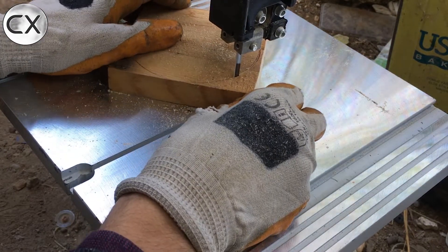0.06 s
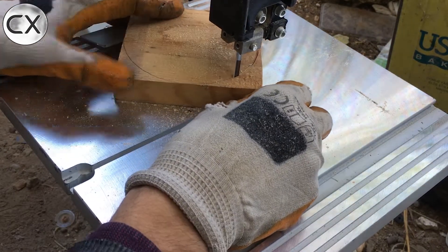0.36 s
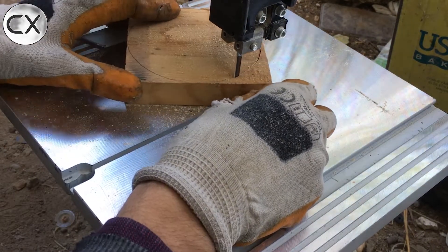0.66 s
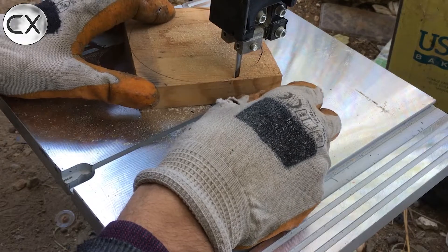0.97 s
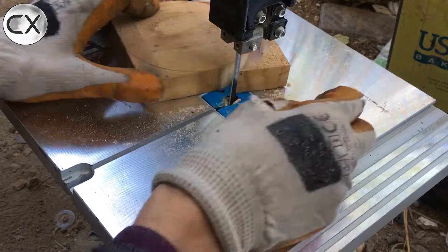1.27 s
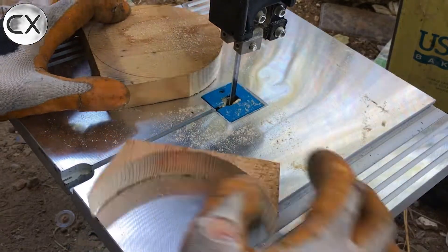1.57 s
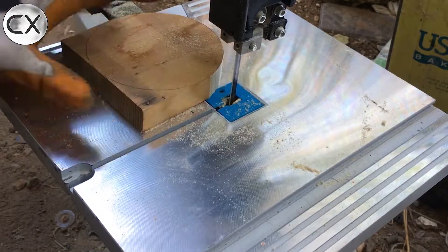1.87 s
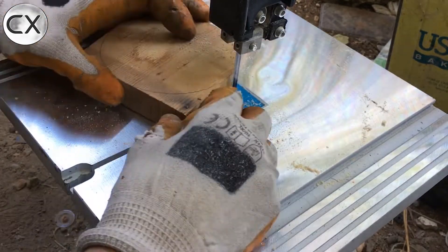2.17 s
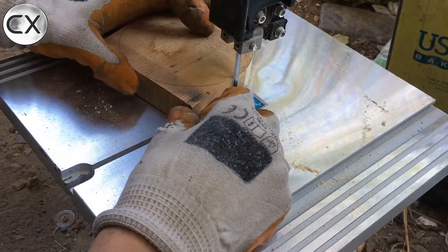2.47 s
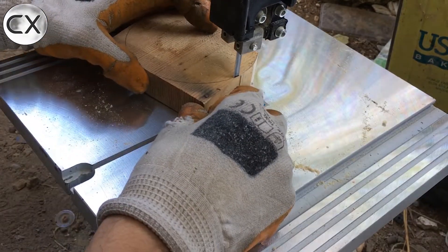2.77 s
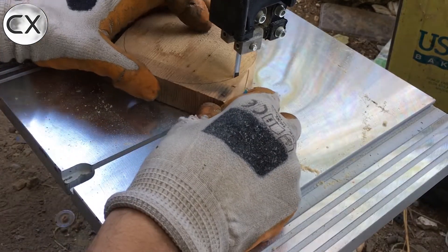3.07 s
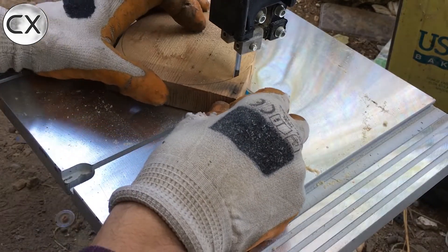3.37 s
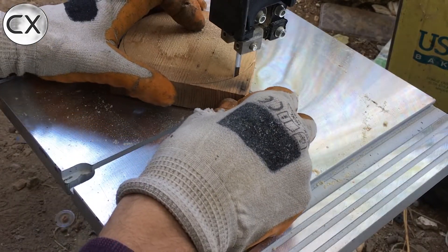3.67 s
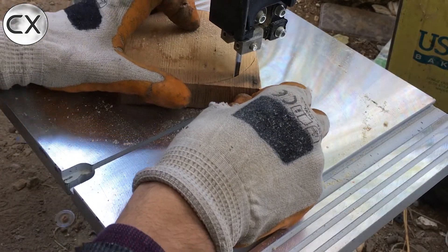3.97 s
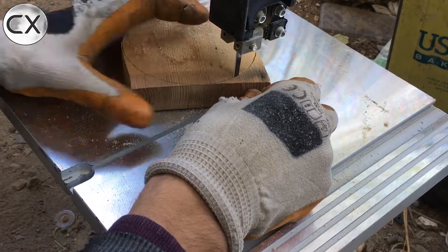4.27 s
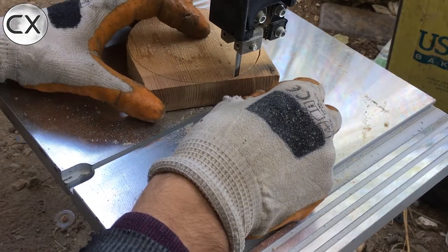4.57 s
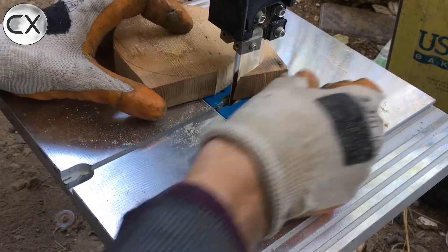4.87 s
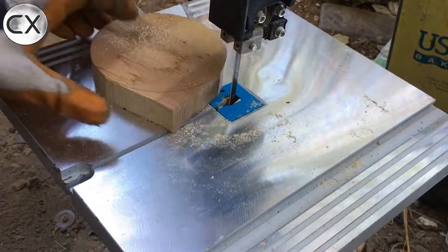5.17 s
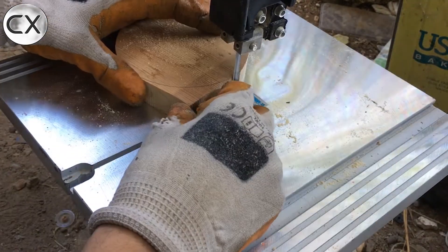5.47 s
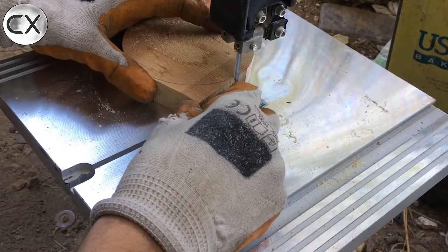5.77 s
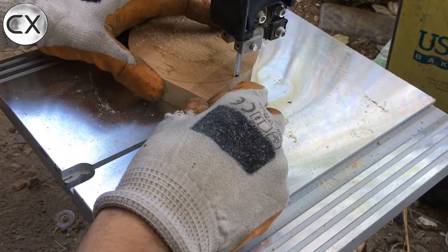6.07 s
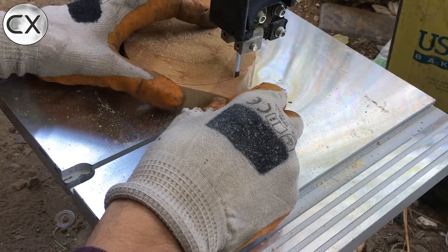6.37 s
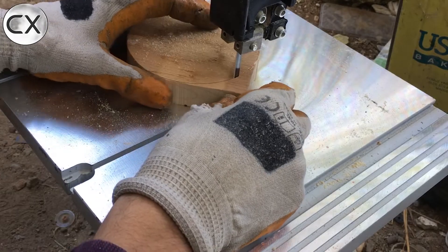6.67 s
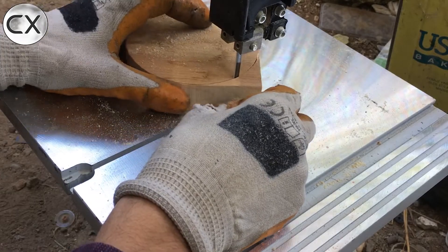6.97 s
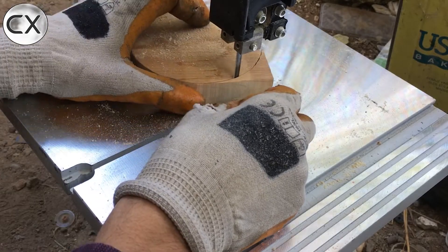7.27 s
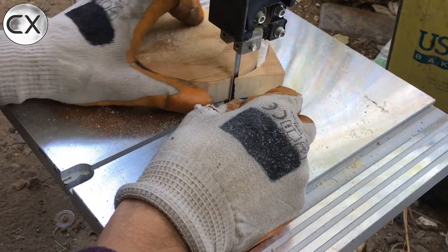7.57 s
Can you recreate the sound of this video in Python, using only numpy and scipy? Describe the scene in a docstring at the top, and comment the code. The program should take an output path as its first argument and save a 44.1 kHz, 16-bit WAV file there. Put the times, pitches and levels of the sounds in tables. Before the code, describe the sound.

A small band saw whines close by through three hissing, squealing cuts in a thick wooden block, running free briefly between them.

```python
"""A workshop, one microphone close to a small band saw; no room sound, both channels alike.
Motor, wheels and teeth whine through the frame, running free between three cuts in a thick wooden block.
Chips tick against the blade and an offcut drops. In the wood the teeth hiss, the grain grabs the blade
into squeals, and the blade rings higher as it is pressed, singing an almost pure tone when held steady."""
import sys
import numpy as np
from scipy import signal
from scipy.fft import rfft, irfft
from scipy.io import wavfile
from scipy.ndimage import uniform_filter1d

SR = 44100
rng = np.random.default_rng(int(sys.argv[2]) if len(sys.argv) > 2 else 0)


def persist_wave(psi):
    """Save psi, clipped to +-1, as 16-bit WAV."""
    counts = np.round(np.clip(psi, -1, 1) * 32767).astype(np.int16)
    wavfile.write(sys.argv[1], SR, np.atleast_2d(counts).T)


N = 336042
T = np.arange(N) / SR
FREE_TURNS_PER_S = 42.62  # the motor with no load

# lines of motor, wheels and teeth: (multiple of motor speed, level free [dB], level in the wood [dB])
WHINE_LINES = [(4.96, -97, -98.5), (6.02, -90.5, -94), (9.69, -104, -86), (12.06, -74, -84),
               (12.73, -94.5, -86), (14.05, -78.5, -83), (14.22, -99.5, -84), (16.27, -84, -87.5),
               (18.04, -88.5, -92), (19.9, -98, -81.5), (21.88, -79.5, -79), (23.82, -86.5, -80),
               (25.74, -96.5, -78), (30.57, -74, -83.5), (39.94, -71, -71), (42, -69, -69),
               (43.95, -65, -72), (45.85, -60, -76), (46, -60, -76), (46.74, -67, -72), (48, -60, -66),
               (48.7, -55.5, -60), (50.69, -74, -73), (52, -66, -70), (54, -69, -74), (54.35, -71, -76),
               (56, -56, -60), (56.33, -61, -63), (57.28, -74, -69), (58, -64, -64), (70, -80, -83),
               (76, -75, -85), (87.34, -70, -79), (90.8, -67, -67), (96, -68, -73), (98, -68, -70),
               (110, -75, -89), (111.8, -68, -74.5), (120, -82, -92.5), (123.5, -83, -92.5),
               (119.8, -79, -91), (137.5, -73.5, -93)]
# slow swell of whine and frame: (time [s], level [dB])
WHINE_SWELL = [(0, 1.3), (1.5, -1), (1.8, -1), (2.3, 0.9), (3.22, -1), (3.42, .8), (4.2, -0.36),
               (4.87, 1.1), (5.05, 0.5), (5.42, 1.5), (5.9, 0.7), (7.05, 0.5), (7.38, 1.5)]
# rolling noise of the frame: (frequency [Hz], level [dB])
FRAME_SPECTRUM = [(20, -149), (110, -145), (190, -126), (380, -112), (550, -106), (820, -110), (1000, -99),
                  (1450, -109), (1650, -97), (2000, -88), (2220, -93.5), (2420, -86.5), (2680, -106),
                  (3000, -104)]
# rolling noise of the blade guides: (frequency [Hz], level [dB])
GUIDE_SPECTRUM = [(2700, -106), (3300, -95.5), (3550, -101), (4100, -85), (4550, -97.5), (5200, -93.5),
                  (5500, -102), (5850, -95), (7050, -106), (7550, -94.5), (8200, -106), (8700, -103),
                  (9200, -109), (10500, -111), (12700, -108), (13600, -114), (15600, -106)]
# the offcut lands and bounces: (time [s], knock level [dB], thud level [dB])
OFFCUT_LANDINGS = [(1.740, -46.5, -51), (1.864, -47.5, -66)]
# modes of the offcut: (frequency [Hz], level [dB], time to fall 60 dB [s])
OFFCUT_MODES = [(480, -19, 0.024), (770, -5, 0.016), (940, -4, 0.039), (1150, 2, 0.019),
                (1480, -2.5, 0.018), (3250, 0, 0.0064), (5200, -10, .008), (7560, 1.5, 0.0079)]
# chips flicked by the teeth: (time [s], level [dB], ring frequency [Hz])
CHIP_HITS = [(1.569, -39, 8600), (1.604, -26.5, 14000), (2.291, -43, 11600), (5.0345, -40.5, 8700),
             (5.044, -44, 8700), (5.107, -44, 8100)]
# wood rubbing blade and table: (start [s], end [s], frequency [Hz], width [Hz], level [dB])
RUB_WHISTLES = [(0, .55, 9570, 120, -62), (1.544, 1.66, 1318, 50.6, -63), (1.62, 1.78, 5280, 200, -67),
                (1.353, 2.5, 12800, 130, -82), (2.266, 2.523, 11760, 253, -65),
                (2.332, 3.2, 12600, 350, -66), (2.62, 3.274, 1335, 110, -74),
                (3.877, 4.33, 15500, 447, -60.5), (5.47, 5.68, 12140, 300, -72.5),
                (6.22, 6.519, 1341, 89.4, -71.5), (6.298, 7.25, 1090, 49.6, -73),
                (6.722, 6.9, 11630, 151.5, -49), (7.151, 7.557, 13880, 1317, -53)]
# resonances of blade and guides: (frequency [Hz], width [Hz], lift [dB])
STEEL_RESONANCES = [(3530, 100, 8.5), (4203, 160, 8), (4364, 115, 7.5), (4674, 50, 7.5), (5950, 130, 3),
                    (6010, 87, 9), (6370, 120, 9.5), (6776, 103, 9), (6865, 42, 7.5), (7500, 200, -0.5),
                    (7760, 190, 12), (8535, 265, 12), (9500, 210, 6.5), (9890, 150, 2), (9650, 42, -2.5),
                    (10330, 90, 5), (10640, 270, 10.5), (11340, 260, 7.5), (11600, 200, 4.5),
                    (13140, 160, 7), (13270, 140, 5.5), (14900, 99, -3)]
# the three cuts: (entry [s], break-out [s], spring-back time [s], entry rasp level [dB])
BLOCK_CUTS = [(-0.5, 1.233, 0.0359, -55), (2.451, 4.842, .038, -48), (5.613, 7.572, .046, -51)]
# the hands ease off to turn the block: (time [s], half length [s], share of the push let go [0-1])
HAND_PAUSES = [(0.166, .025, 0.1), (0.432, 0.043, 0.24), (2.536, .02, .1), (4.337, .028, .51),
               (6.586, .029, 0.57)]
# hiss of the teeth in the wood: (frequency [Hz], level [dB])
KERF_SPECTRUM = [(2700, -103), (3100, -99), (3500, -84.5), (4300, -88.5), (5300, -91), (7200, -96),
                 (8100, -99), (8800, -87.5), (10400, -92.5), (11050, -91), (12300, -89), (13500, -86),
                 (15600, -88)]
# the grain grabs the blade: (start [s], end [s], level [dB], first pitch [Hz], last pitch [Hz])
GRAIN_SQUEALS = [(-.03, 0.046, -47, 9560, 9540), (.115, .275, -51.5, 9600, 9450),
                 (.53, .63, -50, 9950, 9700), (.77, 1.0, -49, 10050, 9950), (1.0, 1.115, -43, 9900, 9600),
                 (1.184, 1.24, -47.5, 9500, 9350), (2.615, 2.67, -44.5, 9780, 9700),
                 (2.69, 3.2, -49.5, 9650, 9880), (3.69, 3.75, -44.5, 9900, 9950),
                 (3.8, 4.281, -47.5, 10000, 9830), (3.93, 4.015, -45, 10100, 9900),
                 (4.055, 4.094, -43, 10140, 9810), (4.39, 4.47, -45.5, 10000, 9930),
                 (4.5, 4.84, -49.5, 9900, 9820), (6.13, 6.52, -50, 9720, 9620),
                 (6.63, 7.146, -48.5, 9600, 9400), (6.76, 6.804, -46.5, 9490, 9520),
                 (6.89, 7.032, -44.5, 10200, 9550), (7.15, 7.56, -45, 9630, 9750),
                 (7.48, 7.541, -42, 9950, 9400)]
# the blade's pitch under full push, highest while the cut twists it: (time [s], pitch [Hz])
PRESSED_PITCH = [(1.2, 3550), (2.6, 3610), (3.7, 3640), (4.3, 3530), (5.7, 3530), (6.2, 3650), (6.6, 3540)]
# how loudly the frame carries the blade's rough note: (pitch [Hz], level [dB])
FRAME_RESPONSE = [(950, -68), (1400, -76), (1680, -47.5), (1800, -45), (2050, -55.5), (2290, -40),
                  (2480, -53), (2850, -57), (3550, -57.5)]
# held steady, the blade sings: (start [s], end [s], pitch [Hz], starting level [dB])
SUNG_NOTES = [(-.02, .38, 3530, -53.5), (.5, 1.213, 3537, -57), (2.59, 2.72, 3680, -47.5),
              (2.72, 3.049, 3660, -50), (3.13, 3.243, 3675, -54.5), (4.39, 4.831, 3560, -55.5),
              (5.66, 6.053, 3530, -55.5), (6.05, 6.298, 3645, -58), (6.63, 7.15, 3577, -55.5)]


def from_db(db):
    """Decibels to gain."""
    return 10 ** (np.asarray(db) / 20)


def in_time(points):
    """A (time, value) curve at every sample."""
    return np.interp(T, *np.transpose(points))


def at_hz(points, hz):
    """Gain of a spectrum, falling 120 dB an octave past its ends."""
    f, db = np.transpose(points)
    octaves_beyond = np.abs(np.log2((hz + 1) / np.clip(hz + 1, f[0], f[-1])))
    return from_db(np.interp(np.log(hz + 1), np.log(f), db) - 120 * octaves_beyond)


def filtered(x, order, hz, kind):
    """Butterworth filter."""
    return signal.sosfilt(signal.butter(order, hz, kind, fs=SR, output="sos"), x)


def hiss(spectrum):
    """Noise with the given spectral density."""
    gain = at_hz(spectrum, np.arange(N // 2 + 1) * SR / N)
    return irfft(rfft(rng.standard_normal(N)) * gain, N) * np.sqrt(SR / 2)


def drift(rate_hz):
    """Smooth random wander, rms 1."""
    lowpass = signal.butter(2, rate_hz, fs=SR / 10, output="sos")
    slow = signal.sosfilt(lowpass, rng.standard_normal(N // 10 + 4002))[4000:]
    slow = slow / np.sqrt(np.mean(slow ** 2) + 1e-20)
    return np.interp(np.arange(N) / 10, np.arange(len(slow)), slow)


def angle(hz):
    """Phase of a moving frequency."""
    return 2 * np.pi * np.cumsum(hz * np.ones(N)) / SR


def narrow(phase, width_hz):
    """A resonance driven by friction: a narrow band of noise."""
    return drift(width_hz / 2) * np.cos(phase) + drift(width_hz / 2) * np.sin(phase)


def ring(x, hz, t60):
    """A unit click sets a sine of height 1 ringing."""
    r, w = from_db(-60 / (t60 * SR)), 2 * np.pi * hz / SR
    return signal.lfilter([0, np.sin(w)], [1, -2 * r * np.cos(w), r * r], x + 1e-18)


def click(s, db):
    """One contact, one sample long."""
    return from_db(db) * (np.arange(N) == round(s * SR))


def held(start, end, fade_s):
    """Fade in around the start, hold, fade out around the end."""
    return np.clip(.5 + np.minimum(T - start, end - T) / fade_s, 0, 1)


def dying(s, decay_s):
    """1 until the given moment, then an exponential decay."""
    return np.exp(-np.maximum(T - s, 0) / decay_s)


def blend(parts):
    """Joint strength and mean pitch of (gain, Hz) parts that share one vibration."""
    power = sum(gain ** 2 for gain, hz in parts) + 1e-20
    return np.sqrt(power), sum(gain ** 2 * hz for gain, hz in parts) / power


def motor(push, grab, cut_sag_hz=.16, squeal_sag_hz=.24, loud_squeal_db=-43, inertia_s=.06):
    """Shaft angle: the motor slows in the wood and more in a squeal, as fast as the wheels allow."""
    sag = cut_sag_hz * push + squeal_sag_hz * grab / from_db(loud_squeal_db)
    keep = np.exp(-1 / (inertia_s * SR))
    sag = signal.lfilter([1 - keep], [1, -keep], sag, zi=[cut_sag_hz])[0]
    return angle(FREE_TURNS_PER_S - sag + 0.02 * drift(8.2))


def whine(turn, load, waver_db=2.0, slip_rad=0.0061):
    """The strong lines of motor, wheels and teeth; each shifts in strength as the blade is loaded."""
    out = 0
    for order, free_db, loaded_db in WHINE_LINES:
        level = from_db(free_db + load * (loaded_db - free_db) + waver_db * drift(10.8))
        phase = order * (turn + slip_rad * drift(8.4)) + rng.uniform(0, 2 * np.pi)
        out = out + level * np.sqrt(2) * np.sin(phase)
    return out


def buzz(turn, body, even_db, odd_db, wheel_db, scatter_db):
    """Even and odd motor harmonics through a body; the wheels, three times slower, add side lines."""
    k, size = np.arange(1000), 2 ** 15  # wheel harmonics, samples in one wheel turn
    line_db = np.where(k % 6 == 0, even_db, np.where(k % 3 == 0, odd_db, wheel_db))
    line_db = line_db + scatter_db * rng.uniform(-1, 1, len(k))
    lines = at_hz(body, k * FREE_TURNS_PER_S / 3) * from_db(line_db)
    cycle = irfft(lines * np.exp(2j * np.pi * rng.random(len(k))), size) * size / np.sqrt(2)
    wheel_position = turn / (6 * np.pi) % 1
    return np.interp(wheel_position * size, np.arange(size), cycle)


def machine(turn, load, flicker_db=0.55):
    """The bed under everything: whine, buzz and rolling noise of the running saw."""
    frame = from_db(-0.5) * hiss(FRAME_SPECTRUM)
    frame += buzz(turn, FRAME_SPECTRUM, even_db=12.5, odd_db=14.0, wheel_db=6.0, scatter_db=4.0)
    guides = from_db(-1.5) * hiss(GUIDE_SPECTRUM)
    guides += buzz(turn, GUIDE_SPECTRUM, even_db=20.5, odd_db=8.5, wheel_db=5.5, scatter_db=0.0)
    guides *= from_db(drift(18) + 0.59 * np.sin(turn / 3) - 4.17)  # pressure varies as the wheels turn
    swell = from_db(in_time(WHINE_SWELL) + flicker_db * drift(8.8))
    return swell * (whine(turn, load) + frame) + guides


def offcut(thud_hz=290, thud_t60=0.013):
    """A piece of wood knocks on the ground: its modes ring over a low thud."""
    knocks = sum(click(s, db) for s, db, _ in OFFCUT_LANDINGS)
    thuds = sum(click(s, db) for s, _, db in OFFCUT_LANDINGS)
    wood = sum((-1) ** k * from_db(db) * ring(knocks, hz, t60)
               for k, (hz, db, t60) in enumerate(OFFCUT_MODES))
    return filtered(wood + ring(thuds, thud_hz, thud_t60), 6, 170, "high")


def chips(t60=0.0081, crack_db=-6.5, crack_s=0.0029):
    """Each chip hits the blade with a crack and a very short ring of steel."""
    out = 0
    for s, db, hz in CHIP_HITS:
        crack = (T >= s) * dying(s, crack_s) * rng.standard_normal(N)
        out = out + ring(click(s, db), hz, t60) + from_db(db + crack_db) * crack
    return filtered(out, 2, 3800, "high")


def rubbing(fade_s=0.1):
    """Wood rubs the blade and the table; each rub whistles in one narrow band."""
    out = 0
    for start, end, hz, width_hz, db in RUB_WHISTLES:
        fade = np.clip(np.minimum(T - start, end - T) / fade_s, 0, 1)
        out = out + from_db(db) * fade * narrow(angle(hz), width_hz)
    return out


def steel(x):
    """Blade and guides colour the sound: each resonance lifts or dips a narrow band."""
    for hz, width_hz, db in STEEL_RESONANCES:
        b, a = signal.iirpeak(hz, hz / width_hz, fs=SR)
        x = x + (from_db(db) - 1) * signal.lfilter(b, a, x)
    return x


def entry_rasps(decay_s=0.021, boost_db=2.0):
    """The first teeth strike the edge of the block with a short rasp."""
    blows = sum(from_db(db + boost_db) * (T >= enter) * dying(enter, decay_s)
                for enter, _, _, db in BLOCK_CUTS)
    rasp = (blows + 1e-12) * rng.standard_normal(N)
    return steel(filtered(rasp, 2, [2400, 6500], "band"))


def feed(first_push=0.58, press_s=0.024, catch_s=0.008, last_push=0.6, snap_s=0.003):
    """Push on the blade (0-1): it builds as the teeth catch, snaps down at break-out, then dies away."""
    push = 0
    for enter, leave, spring_s, _ in BLOCK_CUTS:
        attack = held(enter, np.inf, catch_s) * (1 - (1 - first_push) * dying(enter, press_s))
        release = last_push * dying(leave, spring_s) + (1 - last_push) * dying(leave, snap_s)
        push = push + attack * release
    for s, half_s, share in HAND_PAUSES:
        push = push * (1 - share * np.exp(-((T - s) / half_s) ** 2))
    return np.clip(push, 0, 1)


def biting(push, full_db=-2.5, graze_db=-10.5, before_s=0.078, after_s=0.08, lag_s=0.005):
    """The teeth bite with the push inside the block and only graze it just before and after a cut."""
    inside = sum(held(enter, leave + lag_s, fade_s=0.02) for enter, leave, _, _ in BLOCK_CUTS)
    near = sum(np.exp(np.minimum(T - enter, 0) / before_s) * dying(leave, after_s)
               for enter, leave, _, _ in BLOCK_CUTS)
    return inside * from_db(full_db) * push ** 0.55 + (1 - inside) * from_db(graze_db) * near


def sawing(turn, bite, throb=0.039, snaps_per_s=26.0):
    """Teeth tear fibres: a grainy hiss that throbs with the motor, and now and then a fibre snaps."""
    tearing = hiss(KERF_SPECTRUM) * from_db(drift(280) - 3.0) * (1 + throb * np.sin(2 * turn))
    snaps = (rng.random(N) < snaps_per_s / SR) * rng.uniform(-1.13, 1, N) * from_db(-39.0)
    snaps = filtered(ring(snaps, hz=9900, t60=0.00087), 3, 4000, "high")
    return steel(bite * (tearing + snaps))


def grabbing(push, fade_s=0.0402, faint_db=-55.0, faint_hz=9700):
    """Strength and pitch of the chatter: faint all through a cut, strong and gliding in the squeals."""
    squeals = [(from_db(db) * held(start, end, fade_s), np.interp(T, [start, end], [from_hz, to_hz]))
               for start, end, db, from_hz, to_hz in GRAIN_SQUEALS]
    strength, hz = blend(squeals + [(from_db(faint_db), faint_hz)])
    return strength * push ** 2, hz


def chatter(turn, grab, hz, sharpness=0.72, clump_db=1.1, flutter_db=2.5, tonal=0.7, spurt_db=1.9):
    """The blade sticks and slips about ten times a burst; bursts come a little slower than motor turns."""
    burst = .954 * turn + .1 * drift(4)
    slips = (np.cos(10 * burst) + np.cos(11 * burst) + np.cos(5 * burst + 1) / 2) / 2
    pulses = np.exp(sharpness * slips) * from_db(clump_db * np.cos(burst) + flutter_db * drift(79))
    hz = hz + 120 * drift(30)
    swing = np.sqrt(2 * tonal) * np.sin(angle(hz + 260 * drift(352)))  # self-excited, unsteady in pitch
    friction = np.sqrt(1 - tonal) * narrow(angle(hz), width_hz=1200)
    squeal = steel(filtered((swing + friction) * pulses, 3, [8500, 10900], "band"))
    squeal = squeal / np.sqrt(uniform_filter1d(squeal ** 2, size=2200))  # level evened over 50 ms
    return grab * from_db(spurt_db * np.tanh(drift(20))) * squeal  # the grain grabs and lets go


def blade_note(turn, push, slack_hz=1011.5, width_hz=290, waver_hz=45.19, pressed_purity=0.22,
               overtone_db=-13.5, throb=0.35, settle_s=0.0067, ring_s=0.2):
    """The blade's note rises and roughens with the push, flaring as it crosses the frame's resonances."""
    hz = slack_hz + push * (in_time(PRESSED_PITCH) - slack_hz)
    purity = 1 - push ** 2 * (1 - pressed_purity)
    phase = angle(hz + push * waver_hz * drift(20))
    note = np.sqrt(2) * purity * np.sin(phase) + np.sqrt(1 - purity ** 2) * narrow(phase, width_hz)
    note += from_db(overtone_db) * push ** 2 * narrow(2 * phase, 2 * width_hz)
    ringing = sum(held(enter + settle_s, np.inf, settle_s) * dying(leave, ring_s)
                  for enter, leave, _, _ in BLOCK_CUTS)
    return ringing * at_hz(FRAME_RESPONSE, hz) * note * (1 + throb * np.sin(2 * turn))


def locking(fade_s=0.03, fall_db_per_s=11):
    """Strength and pitch of the singing: each listed note locks in, then slowly fades."""
    return blend([(held(start, end, fade_s) * from_db(db - fall_db_per_s * (T - start)), hz)
                  for start, end, hz, db in SUNG_NOTES])


def singing(turn, strength, hz, waver_hz=7.25, throb=0.26, flicker_db=1.5, octave_db=-17.0):
    """The locked blade gives a clean tone with a faint octave, throbbing with the motor."""
    phase = angle(hz + waver_hz * drift(25.5))
    tone = np.sqrt(2) * (np.sin(phase) + from_db(octave_db) * np.sin(2 * phase))
    return strength * from_db(flicker_db * drift(11)) * tone * (1 + throb * np.sin(2 * turn))


def scene(loud_sing_db=-50, hiss_drop_db=1.5, rough_drop_db=5.5):
    """The saw from close by, in mono on two channels; the push of the wood loads motor and blade."""
    push = feed()
    bite = biting(push)
    grab, squeal_hz = grabbing(push)
    sing, sing_hz = locking()
    locked = np.minimum(sing / from_db(loud_sing_db), 1) ** 2  # a loudly singing blade cuts more smoothly
    turn = motor(push, grab)
    cutting = from_db(-hiss_drop_db * locked) * sawing(turn, bite) + chatter(turn, grab, squeal_hz)
    blade = from_db(-rough_drop_db * locked) * blade_note(turn, push) + singing(turn, sing, sing_hz)
    saw = machine(turn, load=np.clip(1.27 * bite, 0, 1)) + cutting + blade + rubbing()
    return np.tile(saw + entry_rasps() + chips() + offcut(), (2, 1))


def record(dry, cutoff_hz=15800):
    """The microphone signal, with the top treble cut steeply."""
    return signal.sosfilt(signal.ellip(12, .1, 80, cutoff_hz, fs=SR, output="sos"), dry)


dry = scene()
out = record(dry)
persist_wave(out)
```